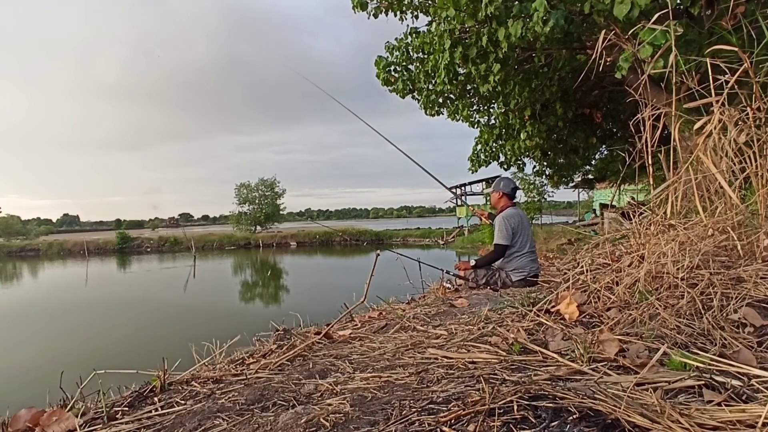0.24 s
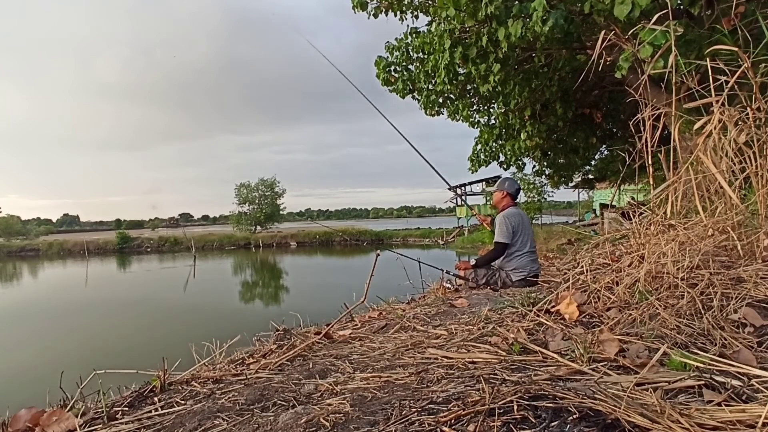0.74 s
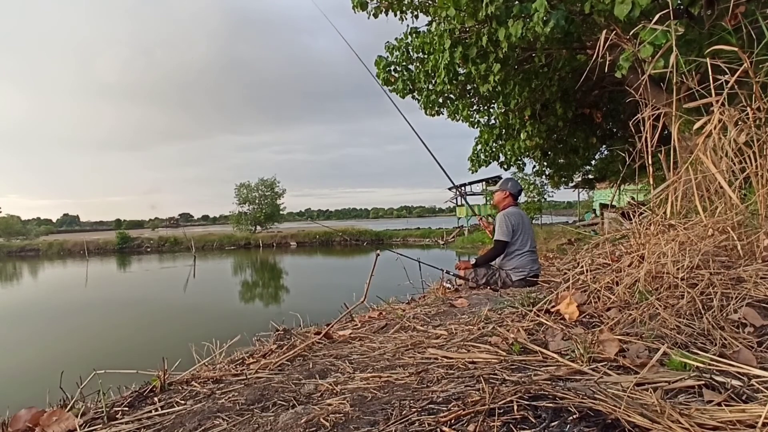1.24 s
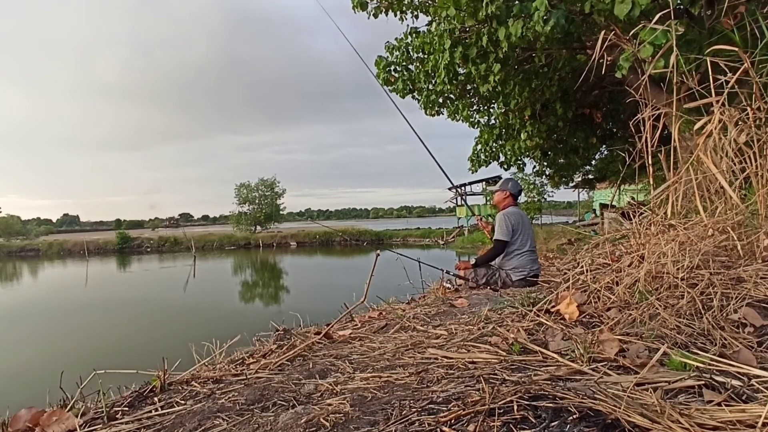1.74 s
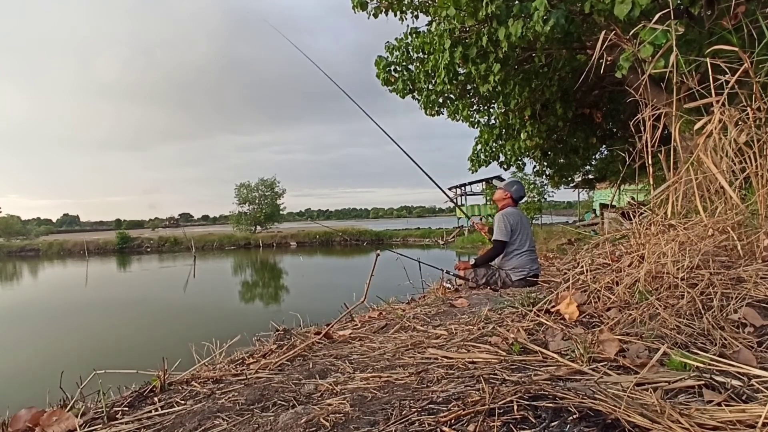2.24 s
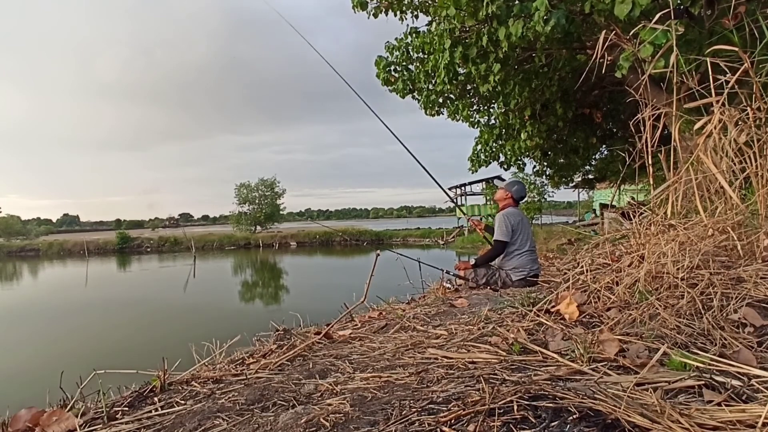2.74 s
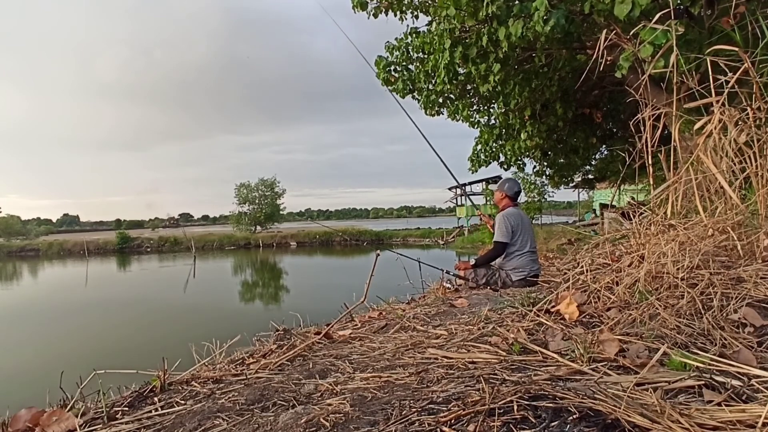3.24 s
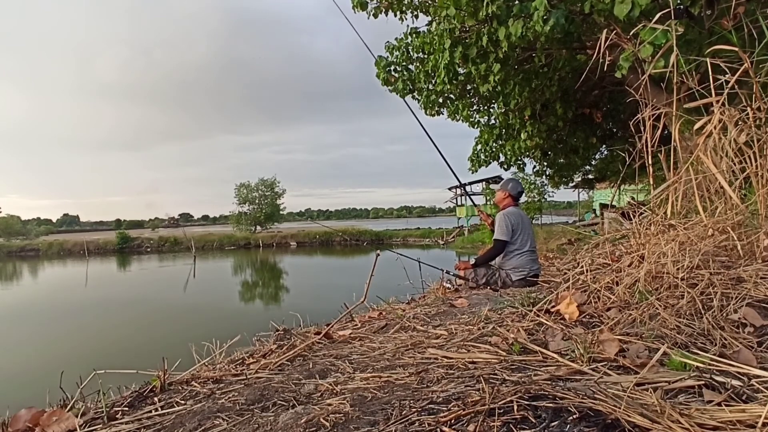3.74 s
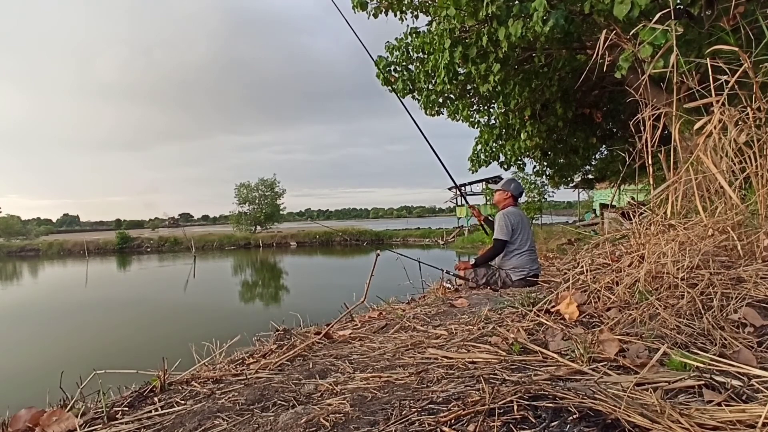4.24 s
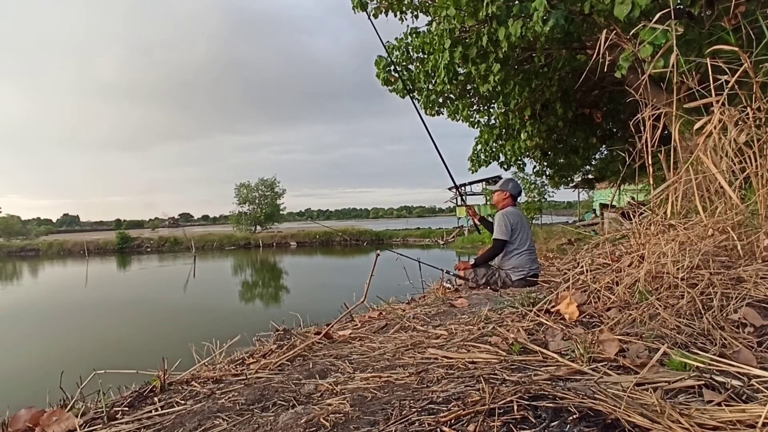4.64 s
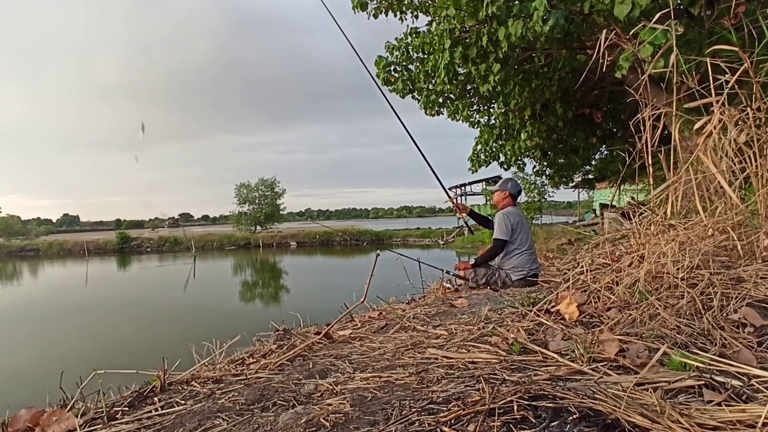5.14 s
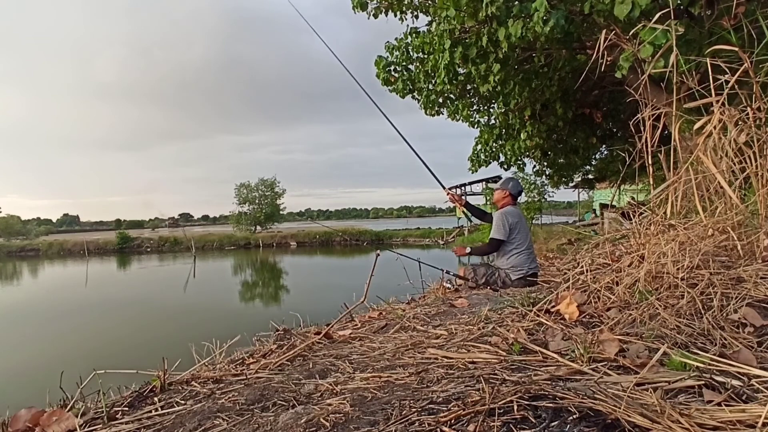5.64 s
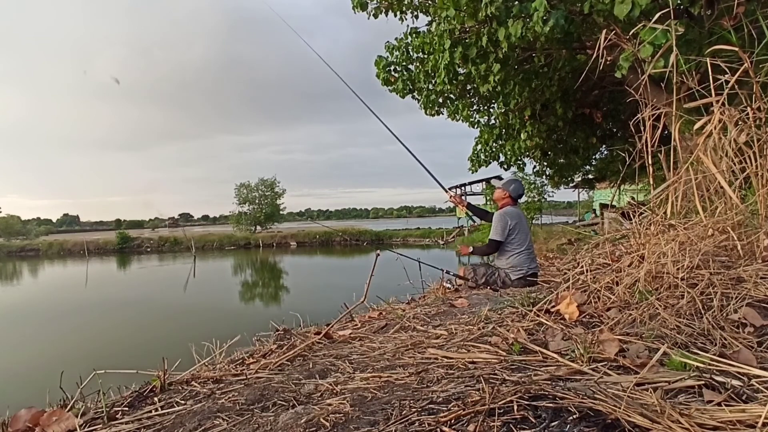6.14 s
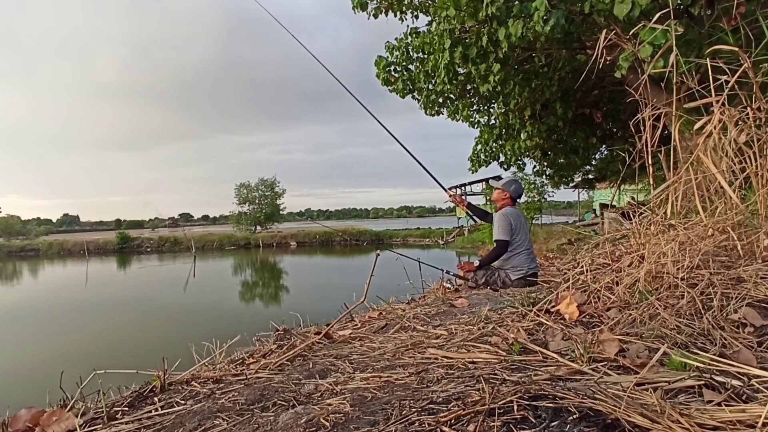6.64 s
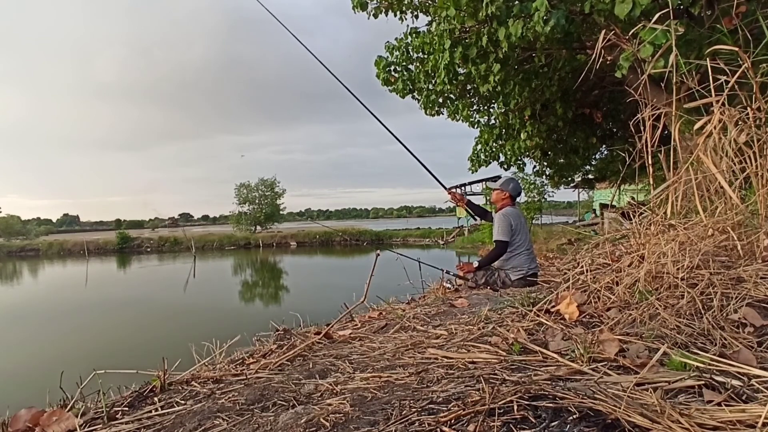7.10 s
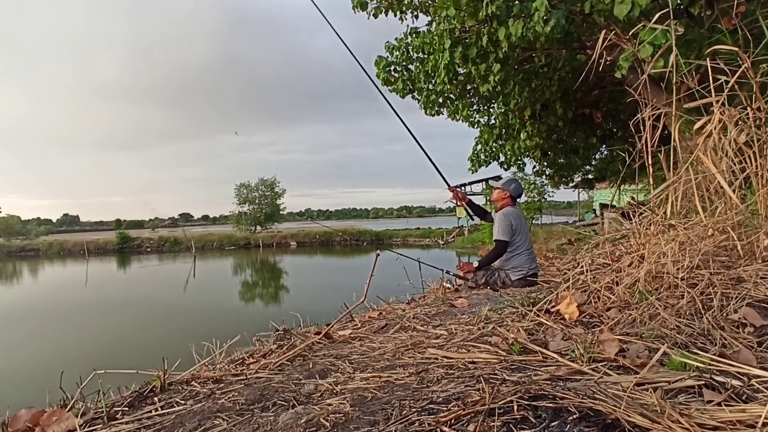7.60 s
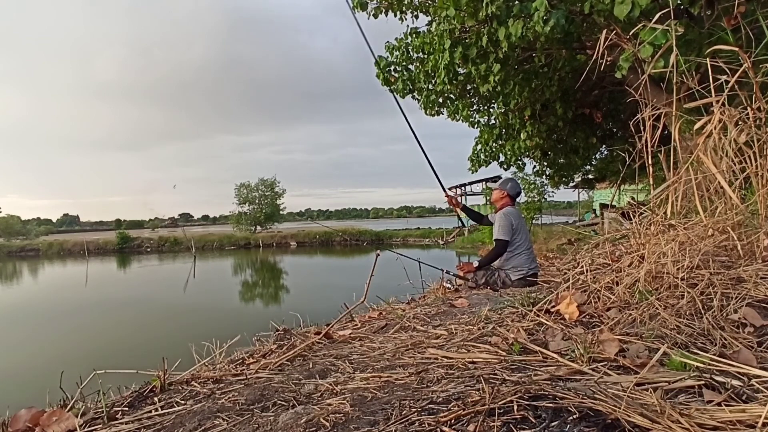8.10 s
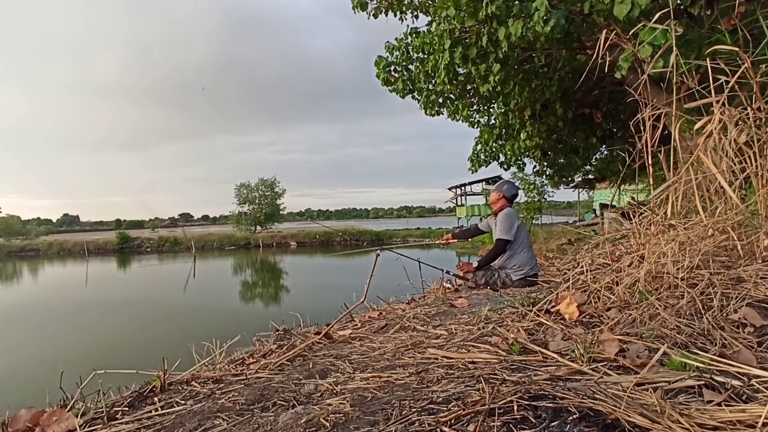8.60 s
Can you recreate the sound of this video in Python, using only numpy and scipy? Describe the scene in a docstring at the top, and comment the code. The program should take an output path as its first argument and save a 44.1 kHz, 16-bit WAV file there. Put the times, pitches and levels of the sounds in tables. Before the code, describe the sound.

Outdoors on a pond bank, one microphone picks up a low distant engine drone, soft rumble and faint hiss. Two katydids rasp shrilly in phrases of about a second over a far insect chorus. Birds give short whistles, chirps and a quick warble around three seconds, with light echoes. Water flops hollowly near the start, middle and later; at the end a tackle snap leads into a thin hissing cast.

```python
"""Pond bank at dusk

One microphone on the bank. A low rumble and a steady hiss lie under a distant engine, built from
tones at multiples of its firing rate. Two katydids rasp in phrases of paired wing strokes over a far
chorus of band-limited noise. Birds whistle and warble as gliding near-sines with echoes; something
flops in the pond in hollow noise bursts with low knocks, and an angler's tackle ticks before a thin
hissing cast.
"""
import sys
import numpy as np
from scipy import signal
from scipy.io import wavfile
from scipy.ndimage import uniform_filter1d

SR = 44100
rng = np.random.default_rng(int(sys.argv[2]) if len(sys.argv) > 2 else 0)


def transcribe(signal):
    """Save signal, clipped to [-1, 1], as a 16-bit WAV file at the path in sys.argv[1]."""
    frames = np.atleast_2d(signal).T
    limited = np.clip(frames, -1, 1)
    pcm = np.round(limited * 32767).astype(np.int16)
    wavfile.write(sys.argv[1], SR, pcm)


N = 390726  # length in samples


def gain_of(db):
    """Decibels to amplitude gain."""
    return 10 ** (np.asarray(db) / 20)


def evened(x):
    """Scales to rms 1."""
    return x / np.sqrt(np.mean(x ** 2) + 1e-20)


def read(points, hz):
    """Reads a spectrum table in dB on a log-frequency axis."""
    f, value = np.transpose(points)
    return np.interp(np.log(hz + 1), np.log(f + 1), value)


def along(rows, t):
    """The columns of a curve table, joined by straight lines, at times t."""
    s, *columns = np.transpose(rows)
    return [np.interp(t, s, column) for column in columns]


def add(mix, start_s, sound):
    """Mixes a sound in at start_s, trimmed to the ends of the mix."""
    at = round(start_s * SR)
    part = mix[max(at, 0):][:len(sound) + min(at, 0)]
    part += sound[max(-at, 0):][:len(part)]


def resonate(x, hz, width_hz):
    """Shifts hz down to zero, smooths, and shifts back: a resonance of gain 1."""
    turn = np.exp(2j * np.pi * np.cumsum(hz * np.ones(len(x))) / SR)
    r = np.exp(-np.pi * width_hz / SR)
    smooth = signal.lfilter([1 - r], [1, -r], x / turn + 1e-18)
    return 2 * (turn * smooth).real


def drift(span_s):
    """Smoothed chance of rms 1 that changes over span_s."""
    size = max(round(span_s * SR), 1)
    once = uniform_filter1d(rng.standard_normal(N), size)
    return evened(uniform_filter1d(once, size))


def noise(db, patchy_db, size):
    """Random short-time spectra; db(hz, t) sets their level, patches drift over them."""
    hop = size // 4
    frames = N // hop + 5
    hz = np.fft.rfftfreq(size, 1 / SR)[:, None]
    a, b, patches = rng.standard_normal((frames, len(hz), 3)).T
    patches = uniform_filter1d(patches, size=10, axis=0)
    patches = evened(uniform_filter1d(patches, size=10, axis=1))
    level_db = db(hz, np.arange(frames) * hop / SR) + patchy_db * patches
    spectra = (a + 1j * b) * gain_of(level_db)
    return signal.istft(spectra, nperseg=size, noverlap=size - hop)[1][:N]


# Colour of the low rumble: pitch_hz, relative level_db
RUMBLE_COLOUR = [(15, -25), (25, -40), (37, -26), (51, -25), (64, -20.5), (96, 0), (134, -4.5), (189, -5.5),
                 (300, -13.5), (535, -20.5), (589, -24), (1010, -33), (2500, -43), (3250, -88),
                 (5500, -120)]
# Rise and fall of the rumble: time_s, level_db, lift_db (added to the colour around 700 Hz)
RUMBLE_SWELL = [(0, -49, 9.5), (1.4, -49, 8), (3.3, -48.5, 1), (4.6, -50, 2.5), (5.5, -48, 1.5),
                (6.3, -49, 3), (8.86, -48.5, 4)]
# Colour of the steady hiss, in shelves: pitch_hz, relative level_db
HISS_COLOUR = [(2000, -0.5), (4700, 1), (5000, -13), (6050, -9.5), (6200, -0.5), (7300, -1), (7800, 0),
               (8480, -9), (8560, -8), (11500, -21), (11700, -8.5), (12800, -7.5), (13000, -6),
               (15500, -2.5)]
HISS_DB = -66


def air():
    """Shaped noise: low rumble with a band near 700 Hz that comes and goes, under a steady hiss."""
    def rumble_db(hz, t):
        near_700 = np.exp(-(np.log2((hz + 1) / 700) / 0.13) ** 2)
        return read(RUMBLE_COLOUR, hz) + near_700 * along(RUMBLE_SWELL, t)[1]

    rumble = evened(noise(rumble_db, patchy_db=0.87, size=2048))
    hiss = evened(noise(lambda hz, t: read(HISS_COLOUR, hz), patchy_db=.5, size=1024))
    swell_db = along(RUMBLE_SWELL, np.arange(N) / SR)[0]
    return gain_of(swell_db) * rumble + gain_of(HISS_DB) * hiss


# Distant engine: time_s, firing_rate_hz, order_1_level_db, order_6_level_db (the whine)
ENGINE_RUN = [(0, 83.5, -44, -64), (.35, 84.5, -45, -58.5), (.7, 86.53, -45, -58), (1.3, 87.37, -44.5, -66),
              (1.5, 88.03, -46.5, -70.5), (2.2, 88.1, -44.5, -67), (2.7, 89.34, -44, -96),
              (3.4, 88.77, -44, -65), (3.9, 90.5, -46.5, -83), (4.6, 92.26, -46.5, -90),
              (5.0, 92.84, -47.5, -64.5), (5.5, 93.95, -47.5, -69.5), (5.92, 92, -47.5, -68),
              (6.08, 87.63, -42, -59), (6.6, 88.84, -41.5, -56), (7.0, 89.47, -43.5, -66),
              (7.5, 90.97, -42, -65.5), (8.2, 91.28, -45, -72.5), (8.86, 92.3, -44, -65.5)]
# Order 9, strongest near the start and the end: time_s, level_db
NINTH_ORDER = [(0, -76), (.35, -69.5), (.6, -79.5), (6.4, -80), (7.4, -72), (8.86, -71.5)]
# Geared part at about 2.6 times the firing rate: time_s, level_db
GEARED_PART = [(0, -57.5), (3, -61), (5.5, -57), (8.86, -56.5)]
# Second motor, heard by its orders 3 and 4: time_s, pitch_hz of order 1, level_db
SECOND_MOTOR = [(0, 47.26, -57), (1.5, 48.19, -53), (3.5, 49.14, -56), (5.2, 49.42, -54.5), (6, 48.74, -58),
                (8.86, 47.9, -74)]
SECOND_DB, THIRD_DB = -51, -67  # mean levels of orders 2 and 3


def engine():
    """Firing orders and a gear order as slightly wavering tones, and a second motor."""
    t = np.arange(N) / SR
    hz, first_db, sixth_db = along(ENGINE_RUN, t)
    turns = np.cumsum(hz * (1 + 0.002827 * drift(0.112))) / SR
    orders = [
        (1, first_db),
        (2, SECOND_DB + 1.5 * drift(.2)),
        (3, THIRD_DB + 4 * drift(.2)),
        (6, sixth_db),
        (9, along(NINTH_ORDER, t)[0]),
        (2.595, along(GEARED_PART, t)[0]),
    ]
    tones = np.zeros(N)
    for order, db in orders:
        wave = np.sin(2 * np.pi * (order * turns + rng.random()))
        tones += gain_of(db + 0.3 * drift(0.03)) * wave

    motor_hz, motor_db = along(SECOND_MOTOR, t)
    motor_turns = np.cumsum(motor_hz) / SR
    third, fourth = np.sin(2 * np.pi * np.outer((3, 4), motor_turns))
    motor = gain_of(2.8 * drift(0.034)) * third + gain_of(-2.0 + 1.8 * drift(0.19)) * fourth
    return np.sqrt(2) * (tones + gain_of(motor_db) * motor)


# Colour of the far chorus: pitch_hz, relative level_db
CHORUS_COLOUR = [(7930, -33), (8020, -9), (8085, -3.5), (8160, -2), (8245, -2.5), (8320, -4), (8450, -14.5),
                 (8540, -66)]
# The far chorus swells and sinks: time_s, level_db
CHORUS_SWELL = [(0, -63.5), (.4, -60.5), (1.0, -64), (1.35, -66), (1.7, -59), (2.6, -64.5), (3.5, -61.5),
                (3.8, -65), (4.4, -60), (5.05, -63.5), (6.2, -62.5), (7.2, -61), (7.95, -64.5),
                (8.86, -60.5)]


def chorus():
    """Many far insects blur into a throbbing band of noise."""
    band = evened(noise(lambda hz, t: read(CHORUS_COLOUR, hz), patchy_db=0.0, size=1024))
    swell_db = along(CHORUS_SWELL, np.arange(N) / SR)[0]
    return gain_of(swell_db + 1.5 * drift(0.016)) * band


def note(shape, db, pitch, length):
    """A near-sine with a faint octave and a slight flutter follows a shape of pitch and level."""
    t = np.arange(0, shape[-1][0] * length, 1 / SR)
    hz, level_db = (uniform_filter1d(c, size=40) for c in along(shape, t / length))
    phase = 2 * np.pi * (np.cumsum(hz * pitch) / SR + rng.random())
    flutter = evened(uniform_filter1d(rng.standard_normal(len(t)), size=120))
    unsteady_db = np.clip((-56 - db) / 3, .5, 3)  # faint notes waver more
    wave = np.sin(phase) + gain_of(-37) * np.sin(2 * phase)
    loudness = np.sqrt(2) * gain_of(db + level_db + unsteady_db * flutter)
    return loudness * wave * signal.windows.tukey(len(t), .05)


# Bird note shapes, before each call's pitch and length factors: time_s, pitch_hz, relative level_db
WHISTLE = [(0, 4200, -8), (.003, 4450, 0), (.006, 4900, -3), (.012, 5050, 0), (.07, 4960, -1.5),
           (.122, 4800, -6), (.132, 4620, -11), (.138, 4250, -11)]
UPSLUR = [(0, 2200, -20), (.006, 2500, -4), (.0145, 2760, 0), (.0165, 3050, -3), (.019, 3350, -14)]
HOOK = [(0, 2180, -10), (.006, 2450, -2), (.021, 2530, 0), (.029, 2430, -1), (.033, 1950, -2),
        (.039, 1500, -6), (.046, 1230, -16)]
# Warble syllable shapes, before the same factors: time_s, pitch_hz, relative level_db
STEP_UP = [(0, 2150, -14), (.006, 2580, -4), (.022, 2620, -2), (.027, 2750, 0), (.030, 3300, -2),
           (.033, 3950, -20)]
FALL = [(0, 3500, -9), (.002, 3200, -1), (.007, 2780, 0), (.015, 2500, -4), (.023, 1950, -26)]
ZIGZAG = [(0, 2100, -22), (.005, 2520, -7), (.013, 2700, 1), (.016, 3250, -3), (.024, 2800, 1),
          (.028, 3400, -8)]
# Syllables of one warble: lag_s (before the length factor), note shape, relative level_db, length_factor
WARBLE_SYLLABLES = [(0, STEP_UP, -2.5, 1), (0.034, FALL, -0.5, 1), (.07, UPSLUR, -13, .6),
                    (0.082, FALL, -2, 0.84), (.104, ZIGZAG, -1, 1), (.134, FALL, -3, .85)]
# Calls of each shape, and whole warbles: start_s, level_db, pitch_factor, length_factor
WHISTLE_CALLS = [(1.196, -55, 0.994, 1.0), (2.295, -74, 0.88, 0.85), (3.405, -71, .795, 0.9),
                 (3.976, -59.5, 1.0, 1.0), (5.535, -77, .79, 0.87), (7.016, -59, 1.012, 0.98),
                 (8.052, -76, .885, .45), (8.505, -74, .79, .85)]
UPSLUR_CALLS = [(2.231, -47, 1.047, 0.85), (3.53, -53, 1, 0.92), (4.893, -46.5, .97, 0.9),
                (6.255, -51, 1.01, 0.95)]
HOOK_CALLS = [(4.24, -68.5, .98, 0.78), (4.427, -58, 1.01, .85), (4.535, -55, 0.98, 1),
              (4.657, -61, 1.01, .95), (4.915, -66, 1.04, 0.89), (5.012, -67, 1.08, 0.9),
              (5.13, -66, 1.0, .9), (5.263, -65, 0.96, 0.9), (7.134, -70, 0.98, .65),
              (7.442, -64, 1.05, 0.6)]
WARBLE_CALLS = [(2.582, -45, 1, 1), (2.914, -48, .99, 1.01), (3.216, -46.5, 1, 1)]
# Short peeps and faint whistles: start_s, length_s, first_hz, last_hz (before a 0.99 pitch factor), level_db
PEEP_CALLS = [(0.418, 0.072, 4020, 3780, -74), (1.123, 0.006, 4700, 4300, -62),
              (1.136, 0.011, 4200, 4430, -64), (1.147, 0.0073, 3630, 4420, -61),
              (1.153, 0.011, 4400, 3800, -62), (1.407, 0.055, 4400, 4560, -70),
              (1.735, 0.07, 4600, 4530, -71), (1.803, 0.05, 4500, 4490, -72), (1.99, 0.07, 4150, 4600, -72),
              (2.583, 0.065, 4540, 4636, -72), (3.925, .008, 3830, 4300, -61),
              (3.928, 0.015, 4270, 4520, -55.5), (3.984, 0.0053, 2500, 2300, -65),
              (4.317, 0.013, 2200, 2600, -66), (4.328, 0.015, 1870, 2150, -69),
              (4.342, 0.01266, 2670, 1680, -59.5), (4.688, 0.021, 1900, 1499, -57),
              (4.699, 0.016, 2500, 2050, -63), (4.714, 0.01, 2040, 2320, -58),
              (4.721, 0.019, 2320, 1700, -64), (6.461, 0.093, 4750, 4630, -67.5),
              (6.967, 0.011, 4020, 3940, -59), (7.469, 0.046, 2463, 1850, -69),
              (5.688, .018, 4600, 4350, -78)]


def birds():
    """Gliding notes; whistles, hooks and peeps, upslurs and warbles all return echoes from the banks."""
    whistling, warbling = np.zeros(N), np.zeros(N)
    for mix, shape, calls in (
        (whistling, WHISTLE, WHISTLE_CALLS),
        (warbling, UPSLUR, UPSLUR_CALLS),
        (whistling, HOOK, HOOK_CALLS),
    ):
        for start_s, *how in calls:
            add(mix, start_s, note(shape, *how))

    for start_s, db, pitch, length in WARBLE_CALLS:
        for lag_s, shape, syllable_db, stretch in WARBLE_SYLLABLES:
            syllable = note(shape, db + syllable_db, pitch, stretch * length)
            add(warbling, start_s + lag_s * length, syllable)

    for start_s, length, first_hz, last_hz, db in PEEP_CALLS:
        early_hz = .8 * first_hz + .2 * last_hz
        late_hz = .2 * first_hz + .8 * last_hz
        shape = [(0, first_hz, -12), (.2, early_hz, 0), (.8, late_hz, 0), (1, last_hz, -12)]
        add(whistling, start_s, note(shape, db, 0.99, length))

    t = np.arange(SR // 2) / SR
    onset = np.clip((t - .015) / 0.0011, 0, 1)  # the first echo comes after 15 ms
    banks = rng.standard_normal(len(t)) * gain_of(-60 * t / 0.27) * onset
    banks = resonate(banks, 3000, 1330)  # reeds and trees return the upper part of the song
    sent = gain_of(-19.5) * warbling + gain_of(-16.5) * resonate(whistling, 4200, 3000)
    echoes = signal.oaconvolve(sent, banks / np.linalg.norm(banks))[:N]
    return whistling + warbling + echoes


# Flops in the water: start_s, level_db, t60_s (at 400 Hz), hollow_hz, hollow_db,
# brightness_db_per_octave (about 500 Hz, level below 200 Hz)
WATER_FLOPS = [(1.435, -53.5, 0.73, 899, 1, -1), (1.479, -45, 0.31, 1230, 5, -4),
               (1.51, -51.5, 0.36, 600.4, 8, -17), (3.15, -58, 0.5, 446, 8, -2.5),
               (4.03, -51, 0.35, 255.1, 20.5, -2.5), (4.085, -55.5, 0.41, 802, 1, -5),
               (5.49, -54, .2, 900, 1, -1), (5.501, -48.5, 0.28, 350, 15, 2.5),
               (5.53, -54, 0.31, 400, 5, 3), (5.556, -53, 0.41, 340, 15.5, -5),
               (5.575, -56, 0.54, 380, 6, -0.5)]
# Colour common to the flops: pitch_hz, relative level_db
FLOP_COLOUR = [(100, -40), (200, -21), (350, -5), (500, -4.5), (1000, -13), (1700, -18.5), (2500, -28.5),
               (4000, -27), (5000, -37), (7000, -63), (8500, -90)]


def flops():
    """Sudden broad splashes of noise with a hollow low note; the treble dies first."""
    def level_db(hz, t):
        power = np.full((len(hz), len(t)), 1e-20)
        for start_s, db, t60_s, hollow_hz, hollow_db, bright_db in WATER_FLOPS:
            now = (t >= start_s) & (t < start_s + 2 * t60_s)
            age_s = t[now] - start_s
            fall = -60 * age_s / (t60_s * (500 / (hz + 100)) ** 0.19)
            hollow = hollow_db * np.exp(-(np.log2((hz + 1) / hollow_hz) / .3) ** 2)
            bright = bright_db * np.log2(np.maximum(hz, 200) / 500)
            power[:, now] += gain_of(2 * (db + fall + hollow + bright))  # doubled dB gives power
        return 10 * np.log10(power) + read(FLOP_COLOUR, hz)

    steady = noise(lambda hz, t: read(FLOP_COLOUR, hz), patchy_db=0, size=512)  # level reference
    return noise(level_db, patchy_db=1.2, size=512) / steady.std()


# Ticks of tackle, and the slaps and low knocks within the flops: start_s, level_db, pitch_hz, t60_s
TICKS_AND_KNOCKS = [(1.479, -42, 480, .2), (1.48, -56, 1300, .1), (1.482, -64, 5700, .12),
                    (5.501, -40, 380, .12), (5.553, -41, 330, .15), (5.572, -41, 380, .12),
                    (5.597, -41, 300, .12), (5.618, -40, 320, .08), (5.5, -56, 4000, .07),
                    (5.503, -52, 1750, .1), (5.696, -52, 1900, .01), (7.743, -53, 4300, .025),
                    (7.743, -55, 6550, .025), (8.32, -41, 4100, .003)]


def ticks_and_knocks():
    """Decaying tones or spits of noise: small ticks of tackle, slaps and hollow knocks of the flops."""
    out = np.zeros(N)
    t = np.arange(SR // 5) / SR
    grits = rng.standard_normal((len(TICKS_AND_KNOCKS), len(t)))
    for (start_s, db, hz, t60_s), grit in zip(TICKS_AND_KNOCKS, grits):
        rough = min(hz * t60_s / 400, 1)  # low knocks and short snaps ring, long high ticks spit
        spit = evened(resonate(resonate(grit, hz, .25 * hz), hz, .25 * hz))
        ring = np.sin(2 * np.pi * hz * t)
        envelope = np.minimum(t / .0002, 1) * gain_of(db - 60 * t / t60_s)
        add(out, start_s, envelope * ((1 - rough) * ring + rough * spit))
    return out


# Line running out: time_s, level_db
CAST_LINE = [(8.325, -85), (8.345, -67), (8.5, -72.5), (8.776, -65.5), (8.86, -81)]


def cast():
    """The angler's line runs out: a thin narrow hiss of twice-resonated noise."""
    t = np.arange(N) / SR
    line = resonate(rng.standard_normal(N), 6870, 1500)
    line = evened(resonate(line, 6720, 1500))
    return line * gain_of(along(CAST_LINE, t)[0]) * (t > CAST_LINE[0][0])


# Katydid phrases: start_s (first stroke), chirp_rate_hz, chirps, level_db (against its usual level)
HIGH_PHRASES = [(.101, 16.08, 17, 1.5), (1.444, 15.97, 17, -1), (2.766, 16.13, 16, -.5),
                (3.918, 16.25, 16, -.5), (5.134, 16.16, 17, 0), (6.457, 16.12, 23, 0),
                (8.114, 16.1, 13, -2.5)]
LOW_PHRASES = [(.002, 14.13, 7, -2), (1.367, 14.23, 12, -2), (2.513, 14.33, 12, -1), (3.966, 14.29, 15, -1),
               (5.521, 14.23, 15, 0), (6.928, 14.25, 7, 0), (8.405, 14.25, 7, -3)]
# Weaker side tones from the high katydid's tooth strikes: pitch_hz, relative level_db
HIGH_SIDE_TONES = [(8105, -10), (7797, -19), (7600, -20)]
# Colour of each scraper's rasp: pitch_hz, relative level_db
HIGH_RASP_COLOUR = [(7100, -34), (7400, -9), (7600, -2), (7750, -6), (8000, 0), (8200, -7), (8400, -4),
                    (8480, -11), (8540, -46)]
LOW_RASP_COLOUR = [(7400, -27.5), (7720, 0.5), (7880, 5.5), (8050, 9.5), (8150, -26.5)]


def katydid(phrases, wing_hz, side_tones, rasp, rasp_db, stroke_s, second, first_db, warm_s):
    """Each chirp is a weak and a strong wing stroke: the wing's tone and the rasp of the scraper."""
    tone, effort = np.zeros(N), np.zeros(N)
    stroke = signal.windows.tukey(round(stroke_s * SR), .8)
    t = np.arange(len(stroke)) / SR
    all_tones = [(wing_hz, 0)] + side_tones
    for start_s, rate_hz, chirps, db in phrases:
        chirp_times = start_s + np.arange(round(chirps)) / rate_hz
        chances = rng.standard_normal((len(chirp_times), 2, 3))
        strokes = ((0, first_db), (second / rate_hz, 0))  # lag in s, level in dB
        for at, chance in zip(chirp_times, chances):
            cold = np.exp(-(at - start_s) / warm_s)  # a phrase opens softer and lower
            for (lag, level_db), (size, tune, turn) in zip(strokes, chance):
                push = (1 - 0.27 * cold) * gain_of(db + level_db + 1.9 * size) * stroke
                hz = wing_hz * (1 - 0.0033 * cold + 0.0016 * tune)
                begin = at + lag - stroke_s / 2
                # the rasp leads by 7 ms; the second stroke rasps less for its tone
                add(effort, begin - .007, push * gain_of(-3 * (lag > 0)))
                wave = np.zeros(len(t))
                for tone_hz, tone_db in all_tones:
                    phase = 2 * np.pi * tone_hz / wing_hz * (hz * t + 10 * turn)
                    wave += gain_of(tone_db) * np.sin(phase)
                add(tone, begin, push * np.sqrt(2) * wave)
    scrape = evened(noise(lambda hz, t: read(rasp, hz), patchy_db=-1.0, size=1024))
    return tone + gain_of(rasp_db) * effort * scrape


GRASS_T60_S, GRASS_DB = 0.14, -11.5


def grass(x):
    """A short scatter of echoes in the grass smears the katydids' strokes."""
    t = np.arange(SR // 5) / SR
    tail = rng.standard_normal(len(t)) * gain_of(-60 * t / GRASS_T60_S)
    return x + gain_of(GRASS_DB) * signal.oaconvolve(x, tail / np.linalg.norm(tail))[:N]


def scene():
    """All sources at one microphone on the bank."""
    high = katydid(HIGH_PHRASES, 8280, HIGH_SIDE_TONES, HIGH_RASP_COLOUR, rasp_db=-7,
                   stroke_s=.020, second=.31, first_db=-2.5, warm_s=0.011)
    low = katydid(LOW_PHRASES, 7975, [], LOW_RASP_COLOUR, rasp_db=-3,
                  stroke_s=0.026, second=.35, first_db=-4.0, warm_s=0.07)
    katydids = grass(gain_of(-55.0) * high + gain_of(-56.0) * low)
    background = air() + engine() + chorus()
    pond = flops() + ticks_and_knocks() + cast()
    return (background + birds() + pond + katydids)[None]


EDGE_HZ = 15500


def record(dry):
    """Band limit of the whole sound: a steep low-pass at EDGE_HZ."""
    low_pass = signal.firwin(1023, EDGE_HZ, window=("kaiser", 9), fs=SR)
    return signal.oaconvolve(dry, low_pass[None], "same")


dry = scene()
out = record(dry)
transcribe(out)
```